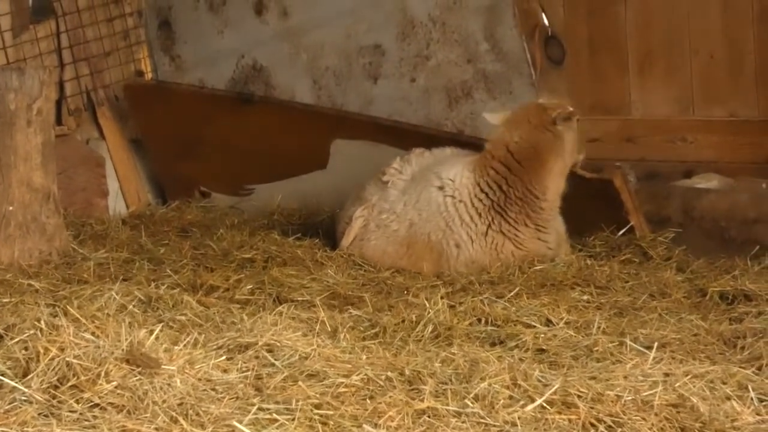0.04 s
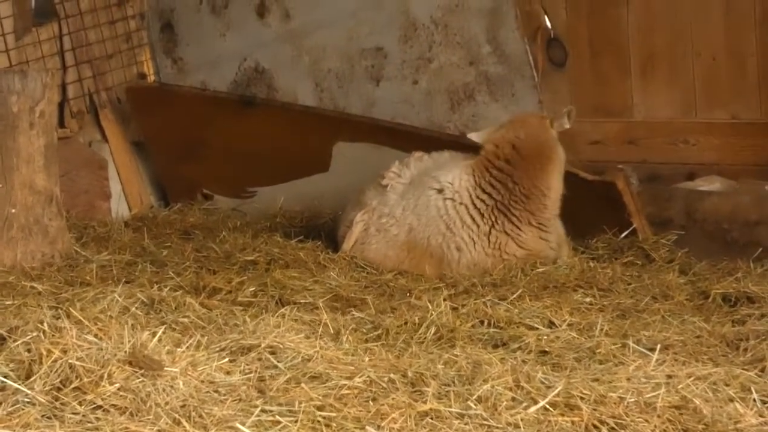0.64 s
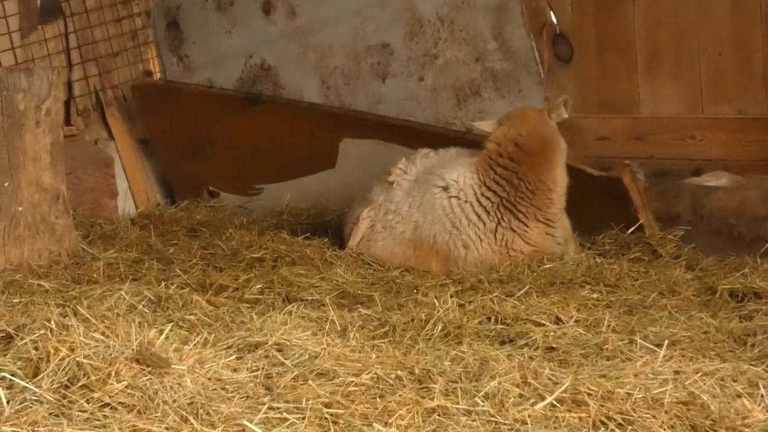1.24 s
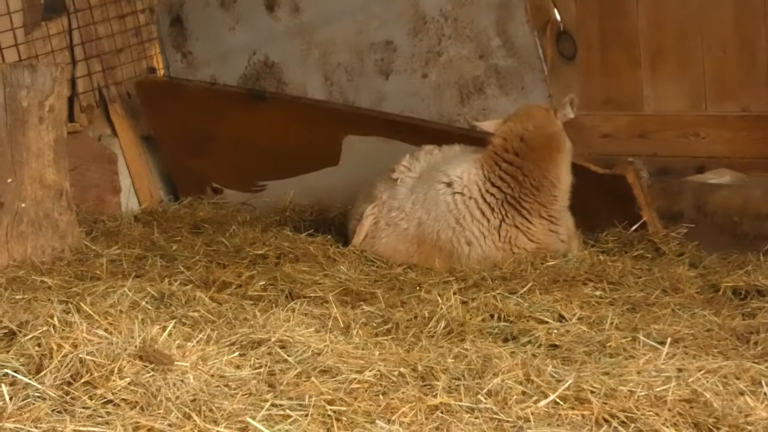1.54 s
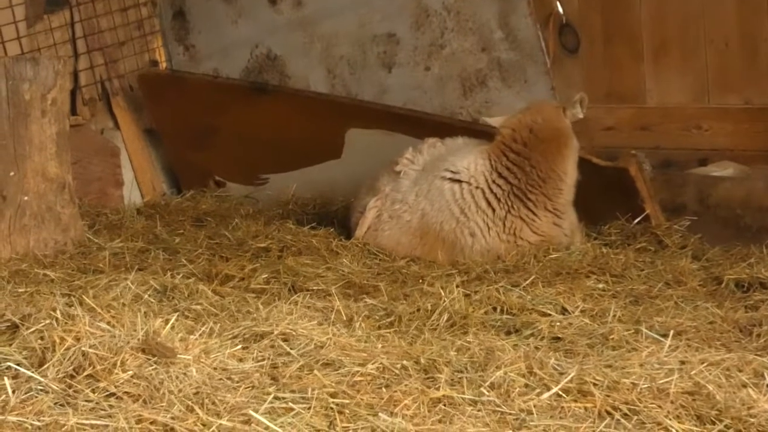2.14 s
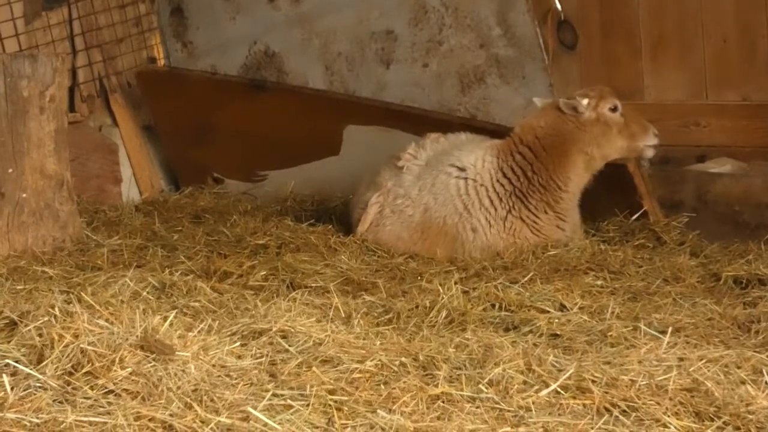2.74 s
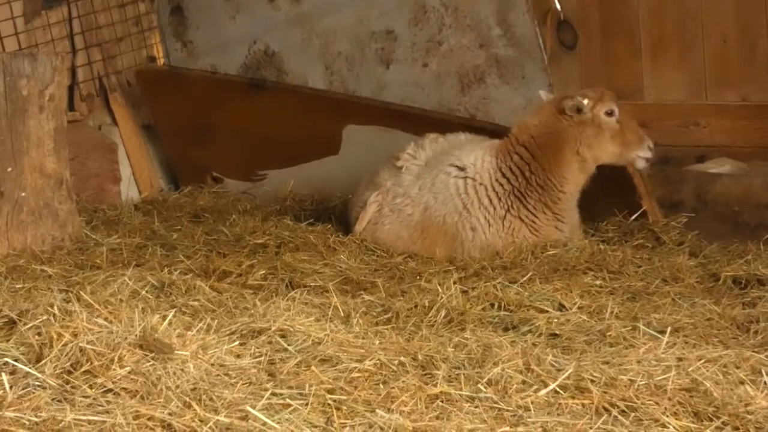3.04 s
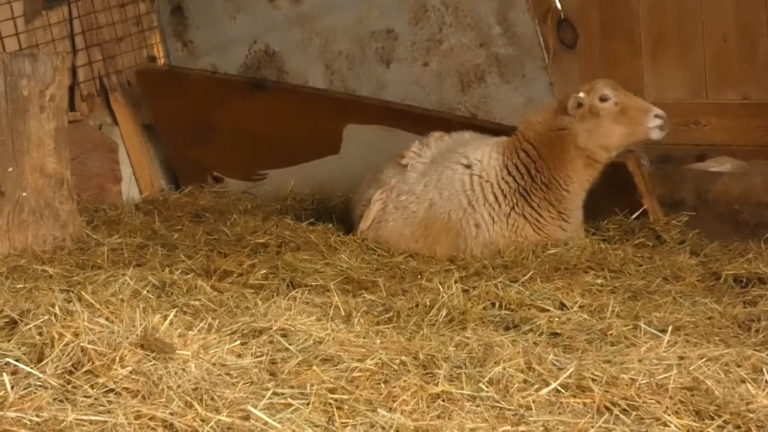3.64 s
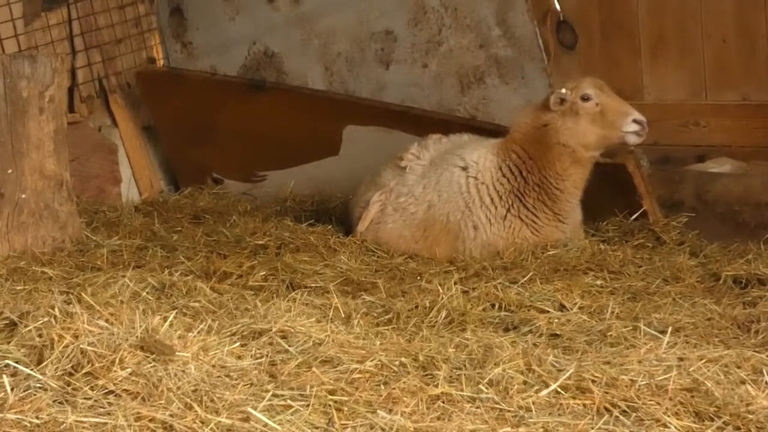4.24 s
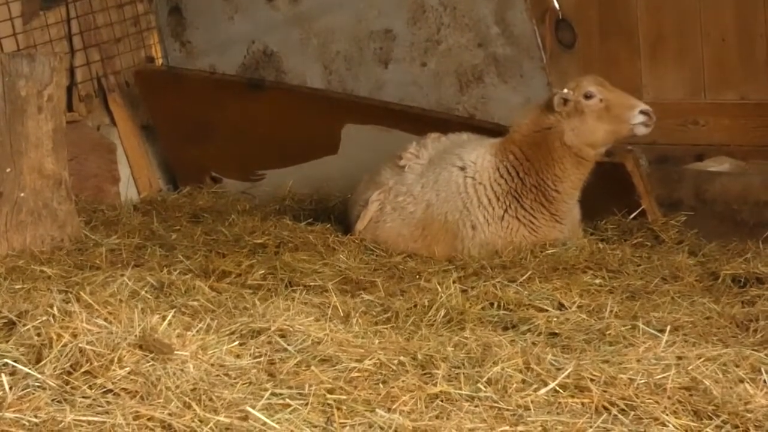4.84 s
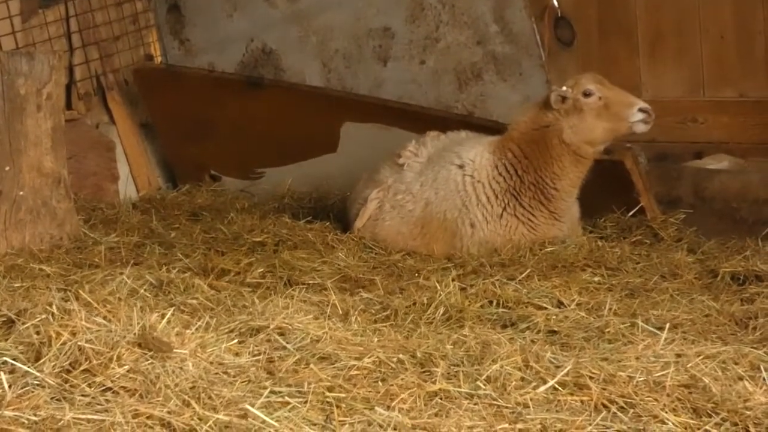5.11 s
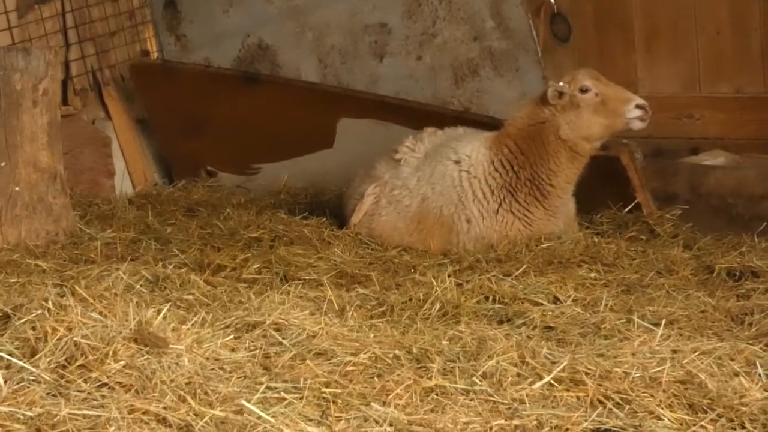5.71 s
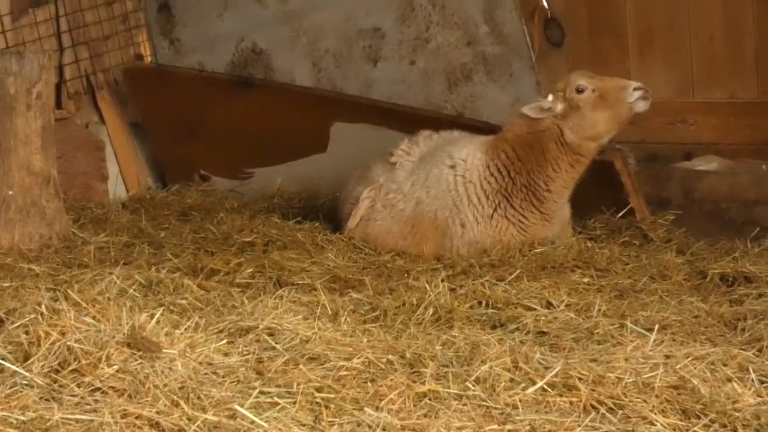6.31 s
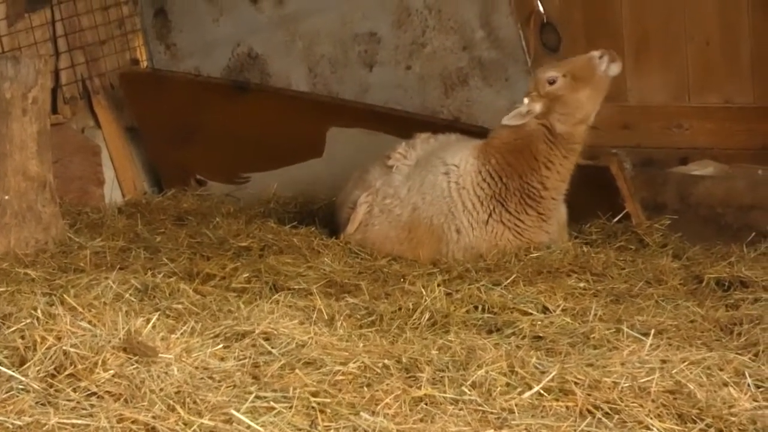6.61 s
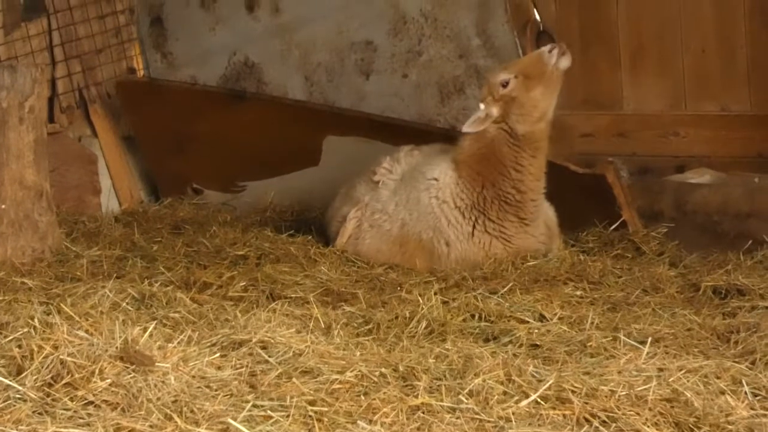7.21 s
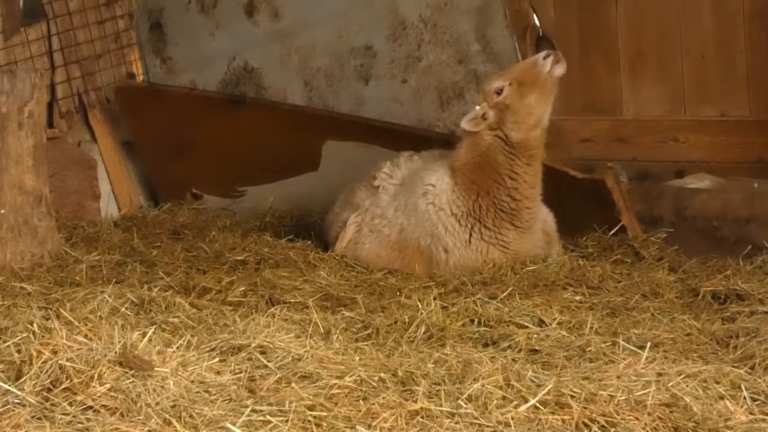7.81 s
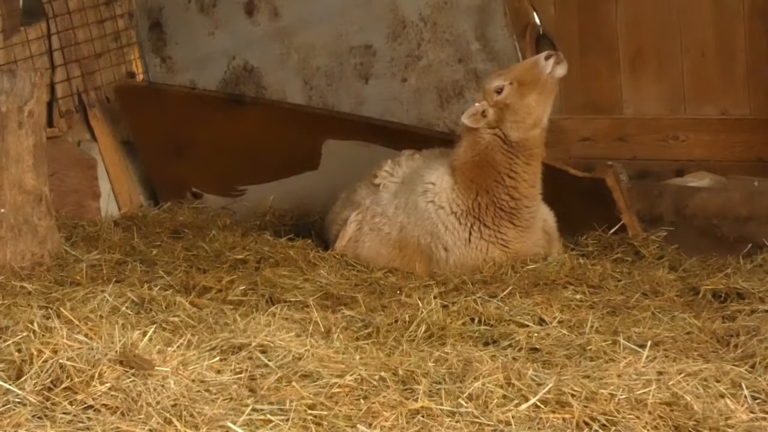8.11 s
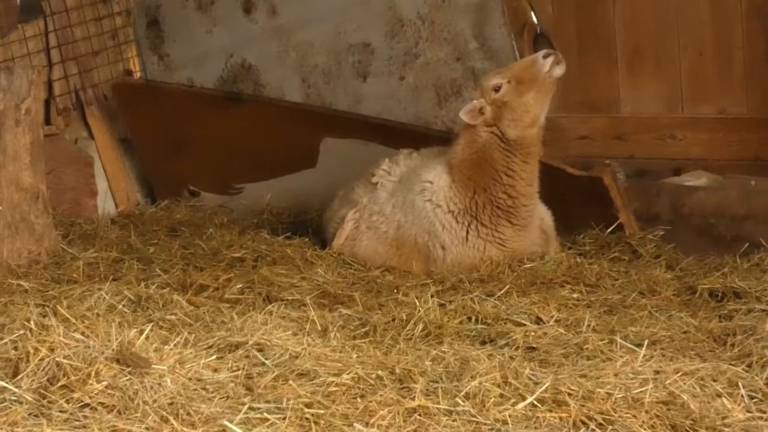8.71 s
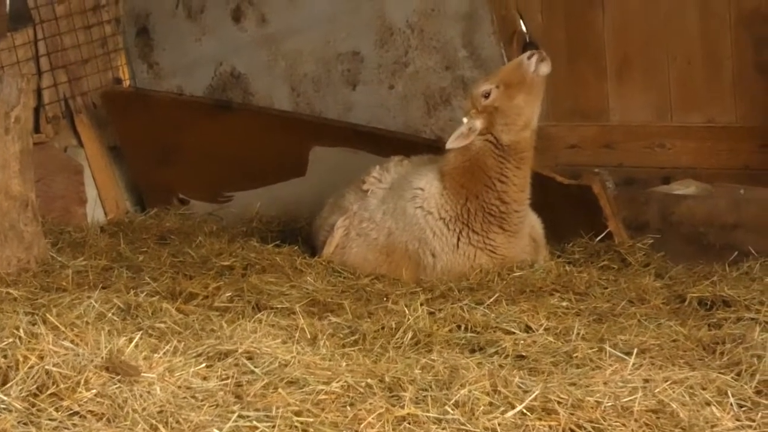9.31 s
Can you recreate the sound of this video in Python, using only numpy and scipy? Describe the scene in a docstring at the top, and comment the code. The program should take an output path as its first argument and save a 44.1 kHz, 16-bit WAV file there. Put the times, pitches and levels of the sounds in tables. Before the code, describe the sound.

Draughts hit the microphone in short, low rumbles and pops inside a barn, over a soft hiss. Faint whistles and buzzy trills from birds outside come first, then sparrows in the rafters call with single bright chirps and one hoarse note, ringing briefly off the boards. Straw rustles very faintly, and a quick cluster of chirps comes with more gusts at the end.

```python
"""Sparrows in a draughty barn

Sparrows chirp in the rafters, each voice a tiny vibrating membrane, and the wooden boards echo them.
Other birds whistle and trill faintly outside. Draughts buffet the microphone in short, low flutters.
Dry straw ticks and rustles now and then over a soft hiss."""
import sys
import numpy as np
from scipy import signal
from scipy.fft import rfft, irfft
from scipy.io import wavfile
from scipy.ndimage import uniform_filter1d, map_coordinates

SR = 44100
rng = np.random.default_rng(int(sys.argv[2]) if len(sys.argv) > 2 else 0)


def transcribe(signal):
    """Save signal, clipped to [-1, 1], as a 16-bit WAV file at the path in sys.argv[1]."""
    frames = np.atleast_2d(signal).T
    limited = np.clip(frames, -1, 1)
    pcm = np.round(limited * 32767).astype(np.int16)
    wavfile.write(sys.argv[1], SR, pcm)


N = 412335
T = np.arange(N) / SR
FREQ = np.fft.rfftfreq(N, 1 / SR)
SPREAD = np.array([[1], [-1]])  # adds a sound on the left and subtracts it on the right


def sparrows(rasp_db=-13):
    """Chirps with a breathy rasp ring in the beak. Returns the sound of a near and a far perch."""
    # Each row: start and length in seconds, starting and crest pitch in Hz,
    # relative level of the lead-in and of the crest in dB, distance from 0 (near) to 1 (far).
    chirps = [(1.882, 0.12, 2190, 4097, -43, -24, 0.34), (2.225, 0.088, 1800, 4140, -38.5, -42, 0.52),
              (3.334, 0.093, 1700, 4090, -48, -47.5, 0.98), (4.588, 0.14, 2185, 4040, -36.5, -21, 0.21),
              (5.506, 0.081, 1900, 3890, -34, -32, 0), (8.554, 0.13, 2224, 4020, -36, -20.5, 0),
              (9.073, 0.08, 1948, 3916, -35, -27.5, 0.29)]
    # How the beak shapes the voice. Each row: frequency in Hz, gain in dB.
    beak = [(1200, -24), (2000, -4), (2700, -6), (3500, -4.5), (4800, -2), (6000, -12.5), (7500, -14),
            (10000, -15), (13000, -35), (16000, -46)]
    near, far = np.zeros(N), np.zeros(N)
    for *shape, distance in chirps:
        call = chirp(*shape)
        near += (1 - distance) * call
        far += distance * call
    rasp = undb(rasp_db) * noise([(800, -16), (2000, 6), (4000, 19), (10000, 0), (14000, 20)])
    # the rasp follows the loudness of the voice
    return [colour(perch + rasp * uniform_filter1d(np.abs(perch), 200), beak) for perch in (near, far)]


def chirp(start, length, start_hz, crest_hz, lead_db, crest_db, slack=.07):
    """One chirp starts low and reedy, then scoops up to where the beak rings and turns full."""
    sweep, crest, end = start + length * np.array([.41, .6, 1])
    lead, fall = (start + sweep) / 2, (crest + end) / 2
    i = span(start - .01, end + .015)
    hz = glide(T[i], [start, lead, sweep - .01, sweep, crest, fall, end],
               [start_hz, 1.18 * start_hz, 1.28 * start_hz,
                .75 * crest_hz, crest_hz, .985 * crest_hz, .84 * crest_hz])
    hz *= 1 - slack * np.abs(wobble(420, len(i)))  # the membrane slackens in quick, rough dips
    db = glide(T[i], [start - .01, start + .008, lead, sweep,
                      (sweep + crest) / 2, fall, end - .004, end + .012],
               [lead_db - 26, lead_db - 4, lead_db, (lead_db + crest_db) / 2 - 3,
                crest_db - 1, crest_db, crest_db - 3, crest_db - 22])
    reedy = glide(T[i], [sweep - .02, sweep + .004], [1., 0.])
    harmonics_db = [-11 * reedy, -23 + 23 * reedy, -26 + 17 * reedy, -34 + 21 * reedy, -45 + 30 * reedy]
    out = np.zeros(N)
    out[i] = undb(db) * voice_box(hz, jitter=.024, flutter_rate=1400, harmonics_db=harmonics_db)
    return out


def voice_box(hz, jitter, flutter_rate, harmonics_db):
    """A bird's membrane vibrates at an unsteady pitch and at whole multiples of it, the harmonics."""
    unsteady_hz = hz * (1 + jitter * wobble(flutter_rate, len(hz)))
    phase = 2 * np.pi * np.cumsum(unsteady_hz) / SR
    return np.sqrt(2) * sum(undb(db) * np.sin(k * phase) for k, db in enumerate(harmonics_db, 1))


def scold():
    """One hoarse call, carried by its second harmonic, clears as its pitch falls."""
    # Each row: time in seconds, pitch in Hz, relative level in dB, roughness from 0 to 1.
    call_shape = [(3.651, 1602, -46.5, 0.42), (3.675, 1743, -44, 0.89), (3.695, 1841, -36.5, 0.47),
                  (3.719, 1610, -33, 0), (3.74, 1500, -41.5, 0), (3.765, 1375, -38, 0.3)]
    times, hz, db, roughness = np.transpose(call_shape)
    i, out = span(times[0], times[-1]), np.zeros(N)
    rough = glide(T[i], times, roughness)
    harmonics_db = [-13, -3 - 5 * rough, -24 + 26 * rough, -29 + 28 * rough,
                    -42 + 20 * rough, -44 + 20 * rough]
    pitch = glide(T[i], times, hz)
    voice = voice_box(pitch, jitter=.025 + .08 * rough, flutter_rate=1000, harmonics_db=harmonics_db)
    hoarse = noise([(700, -27), (1250, 13), (1800, 12), (2300, -2), (3300, 14.5),
                    (7000, -15), (10000, -2.5), (14000, -32)])[i]
    out[i] = undb(glide(T[i], times, db)) * (voice + undb(-11) * (1 + rough) * hoarse)
    return out


def thin_notes():
    """The barn birds slip in short, thin whistles."""
    # Each row: start and end in seconds, first, middle and last pitch in Hz, relative level in dB.
    notes = [(1.882, 1.915, 6300, 5750, 5500, -53), (1.914, 1.945, 5700, 6100, 6440, -51),
             (4.595, 4.642, 5400, 5700, 5740, -43), (8.464, 8.490, 4200, 6450, 7100, -51),
             (8.486, 8.524, 6500, 5600, 4160, -43), (8.517, 8.535, 4500, 5900, 6940, -44),
             (8.531, 8.562, 6600, 5670, 3830, -39), (8.562, 8.618, 4400, 4660, 4880, -37),
             (9.268, 9.312, 2560, 2610, 2600, -46.5), (9.320, 9.37, 2600, 2550, 2560, -54)]
    return whistles(notes, overtone_db=-21)


def outdoor_whistles():
    """Birds outside whistle faint, clear notes."""
    # Each row: start and end in seconds, first, middle and last pitch in Hz, relative level in dB.
    notes = [(-.08, .30, 2827, 2910, 2823, -56), (.07, .20, 3400, 3330, 3270, -62),
             (.275, .365, 3870, 3840, 3650, -51.5), (.28, .40, 3260, 3170, 2790, -59),
             (.30, .62, 2910, 2850, 2980, -63), (.52, .58, 3650, 3600, 3460, -64),
             (.71, .84, 3350, 3430, 3375, -58), (.90, .97, 3550, 3430, 3300, -60.5),
             (.91, .97, 3050, 2880, 2860, -61), (1.09, 1.16, 5200, 5900, 6200, -64),
             (1.195, 1.25, 3550, 3520, 3350, -57.5), (1.195, 1.26, 3050, 2960, 2830, -58),
             (1.25, 1.45, 4000, 3990, 3950, -68.5), (1.61, 1.73, 5180, 5030, 4800, -70),
             (2.41, 2.45, 3600, 3250, 2960, -60), (2.55, 2.58, 3970, 3400, 3200, -56.5),
             (2.67, 2.71, 3960, 3450, 3130, -57), (2.60, 2.91, 2717, 3030, 3170, -58)]
    return whistles(notes, overtone_db=-40)


def whistles(notes, overtone_db):
    """Nearly pure notes swell and fade as they bend through three pitches."""
    out = np.zeros(N)
    for start, end, *pitches, db in notes:
        i = span(start, end)
        hz = glide(T[i], [start, (start + end) / 2, end], pitches)
        swell = np.sqrt(np.abs(np.sin(np.pi * (T[i] - start) / (end - start + 1e-6))))
        voice = voice_box(hz, jitter=.012, flutter_rate=600, harmonics_db=[0, overtone_db])
        out[i] += undb(db) * swell * voice
    return out


def trills(buzz_hz=110, depth=.06):
    """Birds outside shake their pitch fast enough to buzz."""
    # Each row: start and end in seconds, centre pitch in Hz, relative level in dB.
    notes = [(2.192, 2.414, 5100, -60), (2.52, 2.582, 5140, -64), (2.66, 2.853, 5300, -63),
             (2.879, 3.01, 4230, -57), (3.033, 3.158, 4220, -56.5), (3.19, 3.31, 4370, -58.5),
             (5.8, 6.052, 4320, -70), (6.08, 6.40, 4220, -67), (6.78, 6.92, 4260, -66)]
    out = np.zeros(N)
    for start, end, hz, db in notes:
        i = span(start, end)
        shaken_hz = hz * (1 + depth * np.sin(2 * np.pi * buzz_hz * T[i]))
        voice = voice_box(shaken_hz, jitter=.034, flutter_rate=1200, harmonics_db=[0])
        out[i] += undb(db) * np.sqrt(np.hanning(len(i))) * voice
    return out


def barn(sound, direct_db, early_db, tail_db, early_s=.025, low_ring_s=.55, high_ring_s=.35):
    """The sound arrives directly, bounces off nearby boards, and leaves a tail that dulls as it dies."""
    t = T[:SR]
    low_pass = signal.butter(2, 6000, fs=SR, output="sos")
    heard = []
    for direct in (undb(direct_db), 0):  # the centre first, then the sides, which get only echoes
        wash = rng.standard_normal(SR)
        low = signal.sosfilt(low_pass, wash)
        tail = (low * undb(-60 * t / low_ring_s) + (wash - low) * undb(-60 * t / high_ring_s)) * (t > .008)
        bounces = rng.standard_normal(SR) * (rng.random(SR) < .03)
        early = bounces * np.exp(-t / early_s) * (t > .001)
        echoes = (undb(early_db) * unit(early) + undb(tail_db) * unit(tail)) / np.sqrt(SR)
        heard.append(direct * sound + signal.fftconvolve(sound, echoes)[:N])
    centre, sides = heard
    return centre + undb(-11) * sides * SPREAD


def airflow(roundness=1.79, unrest_db=2):
    """Gusts rise and die over a restless draught. Returns the strength of the wind and of its sputter."""
    # Each row: peak time, rise and fall in seconds, relative level in dB, sputter in dB against that.
    gusts = [(.555, 0.037, 0.042, -18.5, -16), (.85, 0.023, 0.018, -34.5, -11),
             (0.964, .025, 0.046, -23.5, -17), (1.255, 0.046, 0.034, -25, -20.5),
             (1.32, 0.026, 0.018, -18, -13.5), (1.441, 0.036, 0.029, -23, -4.5),
             (1.59, 0.073, 0.074, -31.5, -15), (1.739, .025, 0.032, -22.5, -5),
             (1.856, 0.057, 0.035, -22.5, -10.5), (1.975, 0.05, 0.032, -21.5, -16),
             (2.08, 0.028, 0.042, -28, -36), (2.235, 0.07, 0.097, -23.5, -13),
             (2.455, 0.044, 0.084, -26.5, -14.5), (2.76, 0.15, 0.063, -41, -6.5),
             (2.99, 0.055, 0.034, -40.5, -13), (3.33, .04, 0.05, -38, -11.5),
             (3.46, 0.042, 0.093, -30.5, -13.5), (3.656, 0.032, 0.017, -35.5, 2.5),
             (3.96, 0.061, 0.032, -21, -15), (4.02, 0.051, 0.072, -23, -4),
             (4.24, 0.087, 0.091, -38.5, -26), (4.515, 0.014, 0.051, -34, -13),
             (5.84, 0.13, 0.069, -30, -15.5), (5.945, 0.029, 0.014, -27.5, -13.5),
             (6.04, 0.041, 0.16, -35.5, -19), (6.214, 0.023, 0.079, -31.5, -11.5),
             (6.417, 0.028, 0.03, -37, -8), (6.61, 0.024, 0.056, -34.5, -25),
             (6.715, .015, 0.017, -33.5, -29), (7.182, 0.069, 0.053, -26.5, -11),
             (7.378, .015, 0.007, -29, -19), (7.62, .12, 0.13, -38.5, -12.5),
             (8.136, 0.053, 0.046, -18.5, -18), (8.496, 0.065, 0.051, -22.5, -9.5),
             (8.635, .02, 0.019, -29.5, -30), (8.775, 0.03, 0.097, -21.5, -10),
             (8.99, 0.033, 0.059, -33, -18), (9.215, 0.064, 0.031, -24.5, -5.5),
             (9.331, 0.022, 0.087, -21.5, -11)]
    # The light draught between gusts. Each row: time in seconds, relative level in dB.
    draught = [(0, -45), (.25, -51), (.75, -40), (1.12, -45.5), (1.4, -39.5), (2.35, -34), (2.65, -51),
               (3.12, -49.5), (3.5, -44.5), (4.3, -44), (4.72, -48.5), (5.25, -48), (5.55, -51),
               (5.95, -38.5), (6.5, -54), (7.05, -38.5), (7.35, -50.5), (9.35, -39.5)]
    power = undb(np.interp(T, *np.transpose(draught))) ** 2
    sputter_power = power * undb(-16) ** 2
    for peak, rise, fall, db, sputter_db in gusts:
        i = span(peak - 4 * rise, peak + 4 * fall)
        from_peak = np.abs(T[i] - peak) / np.where(T[i] < peak, rise, fall)
        gust = undb(db) * np.exp(-from_peak ** roundness)  # 1 gives a pointed peak, 2 a round one
        power[i] += gust ** 2
        sputter_power[i] += (gust * undb(sputter_db)) ** 2
    unrest = undb(unrest_db * wobble(24))
    return unrest * np.sqrt(power), unrest * np.sqrt(sputter_power)


def wind(strength, sputter_strength, flutter_db=4, crackle_db=7.5, shelter_delay_s=.00069):
    """Churning air rumbles on both sides of the microphone and sputters on the right, facing the wind."""
    # The tone of the soft rumble. Each row: frequency in Hz, relative level in dB.
    rumble_tone = [(25, -52), (45, -47), (70, -21.5), (110, -4), (170, -3), (250, -7.5), (350, -20.5),
                   (500, -40), (900, -84)]
    # The tone of the sharper sputter. Each row: frequency in Hz, relative level in dB.
    sputter_tone = [(100, -28), (220, -7), (320, 0.5), (450, -7), (650, -18.5), (1000, -42.5), (2000, -69),
                    (4000, -91)]
    flutter = undb(flutter_db * wobble(60))
    rumble = steady(flutter * (noise(rumble_tone) + undb(-8) * noise(rumble_tone) * SPREAD))
    crackle = flutter * rng.standard_normal(N) * undb(crackle_db * wobble(160))
    sputter = steady(colour(crackle, sputter_tone))
    # the same sputter reaches the sheltered left side a moment later and weaker
    sheltered = np.roll(sputter, int(shelter_delay_s * SR))
    sputter_pair = np.array([undb(-9) * sheltered, undb(4.5) * sputter])
    low_cut = signal.butter(2, 65, "highpass", fs=SR, output="sos")
    return signal.sosfilt(low_cut, undb(-3) * strength * rumble + sputter_strength * sputter_pair)


def eddies(strength, pop_hz=330, lag_s=.00319):
    """Each eddy, a small whirl of air, swings the pressure once; its sharp core pops on the right."""
    # Each row: time in seconds, relative level in dB, pitch in Hz, relative level of the core in dB.
    strong_eddies = [(0.024, -22, 128, -57), (0.543, -15, 151, -39), (0.58, -17, 150, -32.5),
                     (1.263, -19.5, 223, -32.5), (1.383, -22, 215, -34.5), (1.447, -12.5, 161, -32),
                     (1.454, -7.5, 261, -33), (1.58, -17.5, 190, -55), (1.732, -10, 192, -33.5),
                     (1.772, -15, 190, -55), (1.998, -19.5, 137, -31), (2.168, -15, 215, -33),
                     (3.279, -23, 260, -36), (3.435, -19, 200, -31), (3.477, -22, 218, -34.5),
                     (3.511, -20, 223, -32.5), (3.637, -15.5, 203, -36), (3.733, -22.5, 202, -43),
                     (3.877, -17.5, 211, -34.5), (3.998, -21, 159, -35), (4.034, -16, 228, -38),
                     (4.835, -22, 263, -42.5), (5.842, -13, 166, -38), (7.163, -13.5, 210, -48),
                     (7.21, -23, 197, -34), (7.663, -23, 107, -31.5), (7.898, -18.5, 246, -56),
                     (8.049, -19, 188, -43), (8.137, -11, 203, -33.5), (8.467, -15, 157, -42),
                     (8.492, -13, 262, -40), (8.803, -22, 155, -33), (9.099, -16.5, 186, -42)]
    all_eddies = list(strong_eddies) + stray_eddies(strength)
    side_db, side_speed = np.array([[-6], [-2]]), np.array([[.9], [1]])  # weaker and slower on the left
    out = np.zeros((2, N))
    for (start, db, hz, core_db), turn in zip(all_eddies, rng.random(len(all_eddies))):
        i = span(start - .015, start + .03)
        t = T[i] - start
        out[:, i] += undb(db + side_db) * swing(side_speed * hz * (t - lag_s), turn)
        out[1, i] += undb(core_db + 13) * pop(pop_hz * t)
    return out


def stray_eddies(strength, count=50, scatter_db=4, typical_hz=190, scatter_octaves=.25):
    """Rows for small eddies at random moments, stronger when the wind that carries them is stronger."""
    at = rng.integers(0, N, count)
    size, pitch = rng.standard_normal((count, 2)).T
    db = 20 * np.log10(strength[at]) + scatter_db * size
    hz = typical_hz * 2 ** (scatter_octaves * pitch)
    return list(zip(T[at], db + 4, hz, db - 26))


def swing(cycles, turn, width=.6):
    """A wave about one cycle long. Cycles count from its centre; turn shifts the wave within it."""
    return np.exp(-(cycles / width) ** 2 / 2) * np.cos(2 * np.pi * (cycles + turn))


def pop(cycles, decay_cycles=.17):
    """A sudden push that rebounds and dies within a cycle or two."""
    age = np.maximum(cycles, 0) / decay_cycles
    return 2 * age ** 2 * np.exp(-age) * np.sin(2 * np.pi * cycles)


def swells():
    """Large, slow eddies press on both sides of the microphone at once with a deep rumble."""
    # Each row: peak time in seconds, spread to either side in seconds, level in dB.
    pushes = [(.2, 0.22, -53.5), (1.95, 0.048, -41), (2.18, 0.017, -34.5), (5.286, 0.11, -48.5),
              (5.873, 0.097, -40), (6.994, 0.023, -37), (8.198, 0.91, -51.5), (8.77, 0.016, -25.5)]
    push = sum(undb(db) * np.exp(-((T - peak) / width) ** 2 / 2) for peak, width, db in pushes)
    return push * noise([(10, 7), (25, -16), (55, 9), (90, 10), (200, -35), (600, -76)])


def straw(grain_db=4):
    """Dry stalks snap and slide in grainy bursts."""
    # Each row: start and length in seconds, relative level in dB, centre and width of the band in Hz.
    rustles = [(2.829, 0.0097, -52.5, 2120, 900), (2.830, 0.008, -57, 5070, 1800),
               (3.076, 0.0091, -58, 2590, 2000), (4.932, .014, -67, 10000, 7000),
               (5.416, .014, -68, 12000, 4000), (6.32, 0.047, -67, 11000, 7000),
               (7.063, .17, -63.5, 8000, 9000)]
    out = np.zeros(N)
    for start, length, db, hz, width_hz in rustles:
        i = span(start, start + length)
        grains = rng.standard_normal(len(i)) * undb(grain_db * wobble(698, len(i)))
        band = signal.iirpeak(hz, max(hz / width_hz, 1), fs=SR)
        out[i] += undb(db) * unit(signal.lfilter(*band, grains * np.hanning(len(i))))
    return colour(out, [(7000, 0), (11000, -4), (15000, -12)])


def background(hiss_db=-57.07, air_db=-54.07):
    """A steady hiss and soft outdoor air, partly alike in both ears."""
    # The tone of the hiss. Each row: frequency in Hz, relative level in dB.
    hiss_tone = [(410, -34), (700, 0.5), (872, 0.5), (1340, -3), (1580, -8), (1780, -5.5), (2330, -7),
                 (3020, -10.5), (4340, -9), (4750, -12), (5920, -12.5), (7870, -17.5), (10200, -17),
                 (15400, -35.5)]
    # The tone of the outdoor air. Each row: frequency in Hz, relative level in dB.
    air_tone = [(30, -45), (70, 3.5), (150, 4), (300, -4.5), (500, 0), (750, -12), (1100, -23), (2500, -61)]
    # How alike left and right are. Each row: frequency in Hz, likeness from 0 to 1.
    ear_likeness = [(100, 0.68), (600, 0.12), (1400, 0.44), (3000, 0.65), (7000, 0.74), (15000, 0.32)]
    likeness = along(ear_likeness)
    centre, sides = (undb(hiss_db) * noise(hiss_tone) + undb(air_db) * noise(air_tone) for _ in range(2))
    centre = irfft(rfft(centre) * np.sqrt((1 + likeness) / 2), N)
    sides = irfft(rfft(sides) * np.sqrt((1 - likeness) / 2), N)
    return centre + sides * SPREAD


def undb(db):
    """Turn decibels into a number to multiply by."""
    return 10 ** (np.asarray(db) / 20)


def unit(x):
    """Scale a sound to an average power of 1."""
    return x / np.sqrt(np.mean(x ** 2) + 1e-20)


def steady(x, window_s=.07):
    """Even out slow changes of level and keep the quick flutter."""
    power = np.mean(np.atleast_2d(x) ** 2, axis=0)
    return x / np.sqrt(np.abs(uniform_filter1d(power, int(window_s * SR))) + 1e-9)


def along(points):
    """Join (Hz, value) points into a curve, giving each octave equal room."""
    hz, value = np.transpose(points)
    return np.interp(np.log(FREQ + 1), np.log(hz), value)


def colour(x, points):
    """Turn frequencies up or down along (Hz, dB) points."""
    return irfft(rfft(x) * undb(along(points)), N)


def noise(points):
    """Noise of power 1 with its tone set by (Hz, dB) points."""
    return unit(colour(rng.standard_normal(N), points))


def wobble(rate, size=N):
    """Smooth random motion of about 1 either way, through `rate` new values a second."""
    steps = np.arange(size) * rate / SR
    return map_coordinates(rng.standard_normal(size // 8 + 4), [steps], order=2, mode="wrap")


def span(start, end):
    """The sample numbers between two times in seconds."""
    return np.arange(max(int(start * SR), 0), min(int(max(end, start + .002) * SR), N))


def glide(t, times, values, smooth_s=.0074):
    """Join values over time with a line that has rounded corners."""
    return uniform_filter1d(np.interp(t, np.sort(times), values), max(int(smooth_s * SR), 1))


def scene():
    """Birds and straw in the barn, birds outside a little to the right, wind and hiss."""
    near, far = sparrows()
    rafters = barn(near + scold() + thin_notes(), direct_db=0, early_db=-1.5, tail_db=-8, early_s=.037)
    far_end = barn(far, direct_db=-4, early_db=-2, tail_db=-7)
    outside = barn(outdoor_whistles() + trills(), direct_db=-2, early_db=-4, tail_db=-6)
    bedding = barn(straw(), direct_db=0, early_db=-8, tail_db=-14)
    birds = undb(-4.5) * rafters + undb(5) * far_end + undb([[-3], [-.5]]) * outside
    strength, sputter_strength = airflow()
    buffets = wind(strength, sputter_strength) + eddies(strength) + swells()
    return birds + undb(3) * bedding + buffets + background()


def record(dry, top_hz=15500):
    """Cut away the very highest treble."""
    return signal.sosfilt(signal.ellip(8, .2, 70, top_hz, fs=SR, output="sos"), dry)


dry = scene()
out = record(dry)
transcribe(out)
```